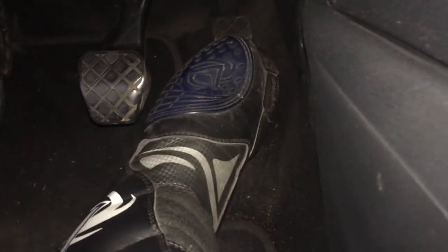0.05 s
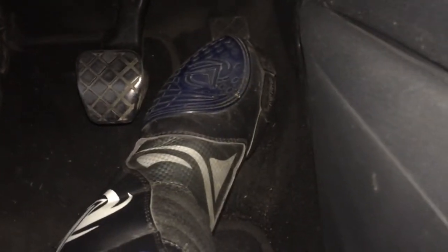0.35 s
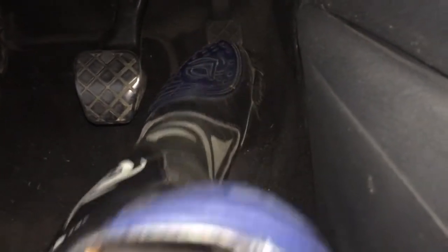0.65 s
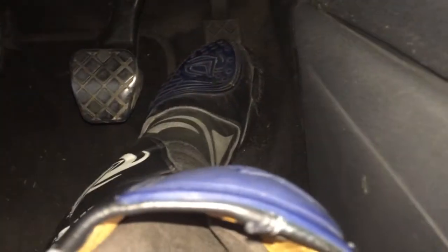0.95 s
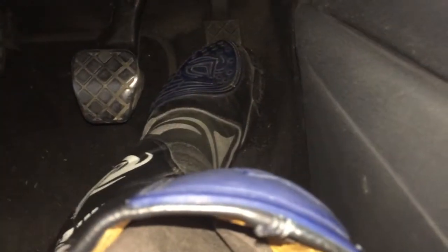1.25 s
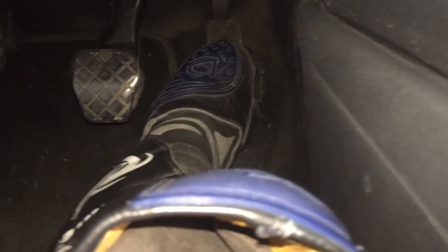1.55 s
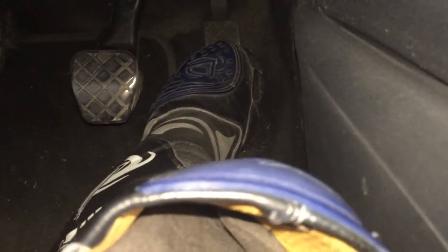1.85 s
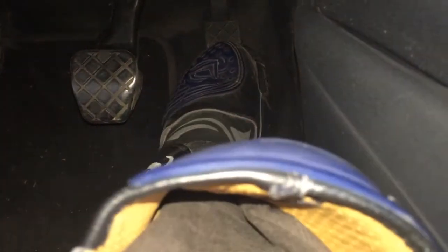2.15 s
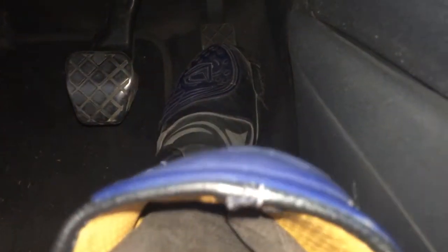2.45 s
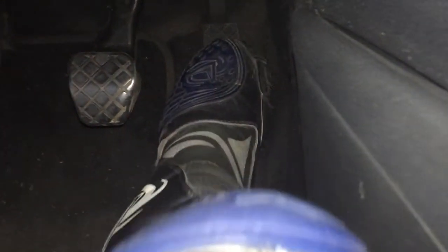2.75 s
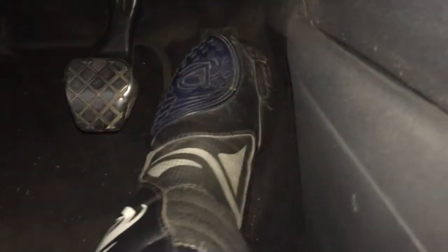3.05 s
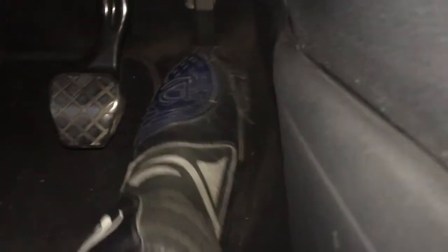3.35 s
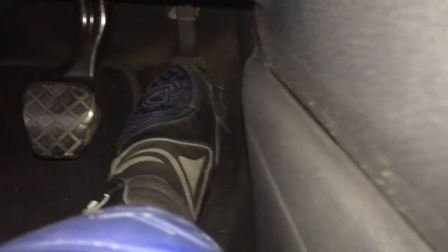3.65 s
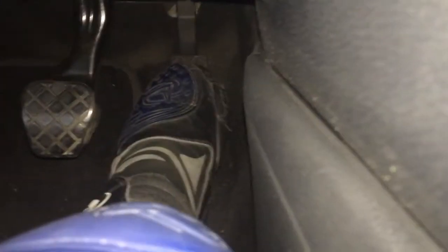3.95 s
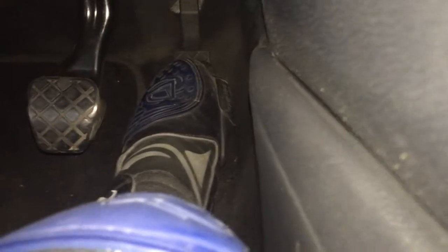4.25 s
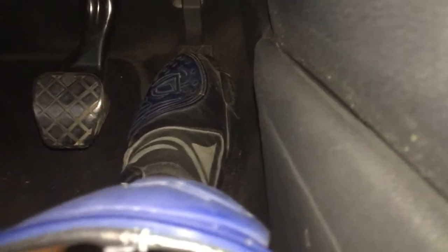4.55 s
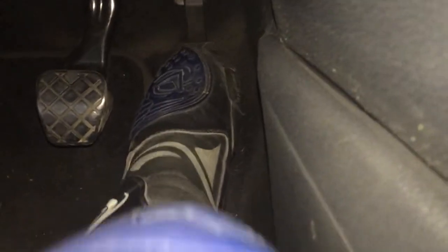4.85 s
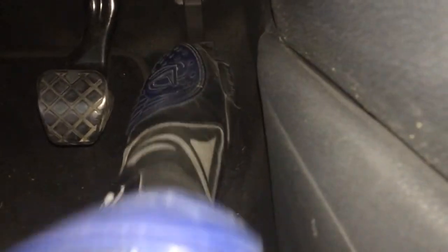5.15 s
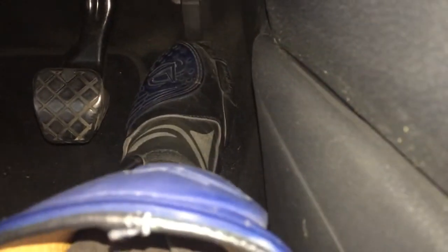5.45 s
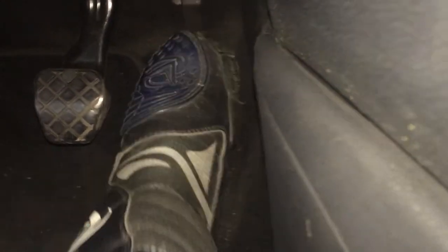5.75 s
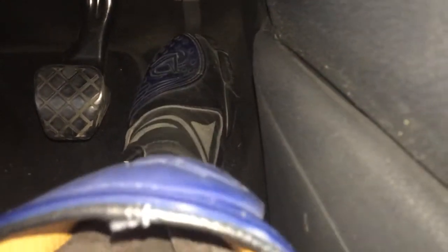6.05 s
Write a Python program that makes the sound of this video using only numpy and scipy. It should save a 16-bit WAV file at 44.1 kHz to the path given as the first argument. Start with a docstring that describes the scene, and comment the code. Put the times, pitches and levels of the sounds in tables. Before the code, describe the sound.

Close inside a humming car, a pedal knocks against its stop and creaks while a rubber sole thuds and scrapes.

```python
"""A car's accelerator pedal, pumped by a shoe, clacks on its end stop and sets the floor pan booming.
Held down, the loaded pedal creaks in runs of tiny slips, each one a sharp click.
The rubber sole thuds, scrapes and squeaks; trouser cloth swishes and snaps as the leg moves.
Under it all lies the low hum of the cabin, and everything is close by in the carpeted footwell."""
import sys
import numpy as np
from scipy import signal
from scipy.fft import rfft, irfft
from scipy.io import wavfile
from scipy.ndimage import map_coordinates

SR = 44100
rng = np.random.default_rng(int(sys.argv[2]) if len(sys.argv) > 2 else 0)


def wav_out(sig):
    """Save sig, one row per channel (or a flat mono array), as 16-bit PCM at SR to the path in sys.argv[1]."""
    wavfile.write(sys.argv[1], SR, np.round(np.clip(np.atleast_2d(sig).T, -1, 1) * 32767).astype(np.int16))


N = 273630
TIME = np.arange(N) / SR
RING = TIME[:SR * 3 // 4]  # time axis of one hit and its tail
TOP_HZ = 15600

# pedal presses: t/s at the stop, clack/dB, boom/dB, crack/dB, travel/s, cloth swish/dB,
# sole scrape/dB, swell over the travel/dB
PRESSES = [(0.7592, -19, -23, -25, 0.14, -49, -48.5, 11),
           (3.5477, -19.5, -23.5, -31.5, 0.11, -54, -50.5, 2.5),
           (5.2908, -19, -22, -22.5, 0.073, -53.5, -50, -2),
           (5.96, -15, -17.5, -18, 0.041, -45, -40.5, 2.5)]
# modes of the floor pan, and last the long ring of the cabin air: f/Hz, level/dB, t60/s
CABIN_MODES = [(44.4, -12, 0.108), (68.3, -10, 0.43), (123.8, 4, 0.12), (162.6, -6.5, 0.11),
               (215.4, -8, 0.14), (278.7, -13.5, 0.14), (364.5, -30.5, 0.31), (423, -12, 0.09),
               (140.2, -20.5, 0.8)]


def amp(db):
    """Decibels to gain."""
    return 10 ** (np.asarray(db) / 20)


def unit(x):
    """Scales to rms 1."""
    return x / np.sqrt(np.mean(x ** 2) + 1e-20)


def eq_gains(curve, size):
    """Spreads an EQ curve (f/Hz, level/dB) over the bins of a transform."""
    hz, db = np.transpose(curve)
    return amp(np.interp(np.log(np.fft.rfftfreq(size, 1 / SR) + 1), np.log(hz), db))


def tint(x, curve):
    """Colours x with an EQ curve (f/Hz, level/dB), at rms 1."""
    return unit(irfft(rfft(x) * eq_gains(curve, len(x)), len(x)))


def click(curve, size=2048):
    """The minimum-phase impulse with this EQ curve, peak 1."""
    cepstrum = irfft(np.log(eq_gains(curve, size)))
    cepstrum[1:size // 2] *= 2
    cepstrum[size // 2 + 1:] = 0
    pulse = irfft(np.exp(rfft(cepstrum)))
    return pulse / abs(pulse).max()


def wander(hz, size):
    """A random drift that turns about hz times a second."""
    knots = rng.standard_normal(size)
    return np.interp(np.arange(size) * hz / SR, np.arange(size), knots)


def fade(t60, rise=1e-5):
    """Envelope of a hit: an attack of about rise seconds, then an exponential tail."""
    return (1 - np.exp(-RING / rise)) * np.exp(-np.log(1000) * RING / t60)


def add(mix, s, sound):
    """Lays a sound into the mix at s seconds."""
    part = mix[max(round(s * SR), 0):][:len(sound)]
    part += sound[:len(part)]


def ring(modes, rise, spread):
    """Struck modes of alternating sign, slightly detuned by the changing load of the foot."""
    detune = 1 + spread * rng.standard_normal(len(modes))
    return sum((-1) ** k * amp(db) * fade(t60, rise) * np.sin(2 * np.pi * hz * detune[k] * RING)
               for k, (hz, db, t60) in enumerate(modes))


def cabin_hum():
    """The bed: a low cabin rumble that wavers slightly under a faint hiss."""
    # colour of the cabin air: f/Hz, level/dB
    hum_eq = [(20, -24.5), (32, -11.5), (45, -16), (56, 9.5), (72, -1), (90, 2), (115, -1), (145, -15),
              (190, -19), (300, -21), (600, -28), (1200, -36.5), (3000, -44.5), (15000, -47)]
    noise = tint(rng.standard_normal(N), hum_eq)
    bass = signal.sosfiltfilt(signal.butter(2, 160, fs=SR, output="sos"), noise)
    waver = amp(2.2 * wander(12, N))
    return amp(-51.5) * (noise + bass * (waver - 1))


def leg_motion():
    """Envelopes of swish, scrape and crackle: presses run to the stop and settle, shifts form an arch."""
    # the foot lifts or shifts: t/s, length/s, cloth swish/dB, sole scrape/dB, crackle/dB
    shifts = [(.01, 0.15, -76.5, -87, -87), (1.778, 0.23, -67.5, -66, -72),
              (1.959, 0.16, -56.5, -49.5, -65), (2.137, 0.17, -64.5, -57.5, -62.5),
              (2.328, .11, -64.5, -57.5, -64), (2.541, 0.094, -66.5, -64, -73),
              (2.64, 0.51, -60, -58.5, -65), (3.084, 0.34, -69.5, -69, -70), (3.78, .32, -100, -74, -80),
              (4.106, 0.27, -81, -70, -76), (4.487, 0.14, -77, -66.5, -74), (4.81, 0.39, -60, -56.5, -68),
              (5.5, 0.095, -82, -60.5, -70), (5.621, .26, -56.5, -50.5, -75)]
    cloth, sole = np.zeros((2, N))
    for stop, *_, travel, cloth_db, sole_db, swell_db in PRESSES:
        before, after = np.maximum(stop - TIME, 0), np.maximum(TIME - stop, 0)
        attack = np.exp(-np.maximum(before - travel, 0) / 0.02)  # the leg gets going
        press = (TIME < stop) * attack * amp(-swell_db * np.minimum(before / travel, 1))
        landed = TIME >= stop  # the cloth comes to rest, and the sole sooner
        cloth += amp(cloth_db) * press + landed * amp(-60.5) * np.exp(-after / 0.18)
        sole += amp(sole_db) * press + landed * amp(-45.5) * np.exp(-after / 0.06)
    crackle = amp(-8) * cloth
    for start, length, cloth_db, sole_db, crackle_db in shifts:
        off_centre = abs(2 * (TIME - start) / length - 1)
        near = off_centre < 2
        arch = amp(-16.5 * off_centre[near] ** 3.44)  # flat top: speeds up, holds, eases off
        cloth[near] += amp(cloth_db) * arch
        sole[near] += amp(sole_db) * arch
        crackle[near] += amp(crackle_db) * arch
    return cloth, sole, crackle


def rubbing(catches_per_s=130):
    """Cloth fibres catch in countless small grains and a few larger ones; the sole scrapes lower down."""
    # colours of the cloth's swish, its larger catches and the sole's scrape: f/Hz, level/dB
    swish_eq = [(300, -19.5), (1200, -15), (2000, -3), (3200, -1), (4500, -3.5), (6300, -4.5),
                (10500, -6.5), (15500, -11)]
    crackle_eq = [(300, -16), (1200, 2.5), (3200, -6), (6300, -4.5), (15500, -12)]
    scrape_eq = [(120, 3), (300, -5.5), (520, 0), (780, 0), (1100, -8.5), (1500, -12.5), (2000, -17),
                 (3000, -16), (8000, -43)]
    cloth, sole, crackle = leg_motion()
    fibres = rng.standard_normal(N) * amp(2.4 * wander(1200, N) + 1.3 * wander(90, N))
    impulses = (rng.random(N) < catches_per_s / SR) * rng.standard_normal(N)
    grain = rng.standard_normal(len(RING)) * fade(t60=0.008)
    catches = signal.oaconvolve(impulses, grain)[:N]
    tread = rng.standard_normal(N) * amp(1.6 * wander(150, N))
    return (cloth * tint(fibres, swish_eq) + crackle * tint(catches, crackle_eq)
            + sole * tint(tread, scrape_eq))


def cloth_snaps():
    """Folds of cloth and laces flick over: a sharp tick and a brief fizz, thin below its resonance."""
    # flicks of cloth and laces: t/s, level/dB, centre f/Hz
    flicks = [(.096, -51, 5000), (.721, -35, 6470), (1.955, -36, 810), (1.974, -35.5, 6200),
              (2.051, -38, 4960), (2.215, -37, 3180), (2.222, -34.5, 820), (2.236, -41, 2780),
              (2.2815, -38.5, 3350), (2.304, -36.5, 4200), (2.375, -40, 3000), (2.994, -34.5, 3240),
              (3.806, -51, 4930), (4.19, -57.5, 3560), (4.844, -45, 3760), (5.256, -31.5, 3320),
              (5.781, -38.5, 3780)]
    out = np.zeros(N)
    for s, db, hz in flicks:
        fizz_eq = [(hz / 4, -20), (hz / 2, -12), (hz, 0), (hz * 2, -6), (16000, -11)]
        fizz = tint(rng.standard_normal(len(RING)), fizz_eq) * fade(t60=0.027)
        tick = fade(t60=0.0036) * np.sin(2 * np.pi * hz * RING)
        add(out, s, amp(db) * (1.43 * tick + 0.4 * fizz))
    return out


def sole_squeaks():
    """Rubber sticks and slips fast enough to make a short, gritty, gliding tone."""
    # chirps of the sole: t/s, level/dB, length/s, starting f/Hz, glide/octaves, roughness/0-1
    chirps = [(0.7342, -38.5, 0.0053, 730, 0.033, 0.41), (1.954, -45.5, 0.002, 3150, 0.0068, 0.1),
              (3.463, -48.5, 0.0087, 892, .05, 0.54), (5.2203, -32.5, 0.015, 1326, 0.52, 0.49),
              (5.919, -33, 0.0091, 1077, 0.22, 0.71)]
    # colour of the sole's grit: f/Hz, level/dB
    grit_eq = [(300, -25), (1100, 3), (2400, -14), (3600, 3.5), (5000, -4), (7000, -5), (15000, -15.5)]
    out = np.zeros(N)
    for s, db, length, hz, glide, rough in chirps:
        along = np.linspace(0, 1, max(int(length * SR), 32))
        pitch = hz * 2 ** (glide * along) * (1 + 0.031 * rough * wander(1120, len(along)))
        turns = np.cumsum(pitch) / SR
        tone = sum(np.sin(2 * np.pi * k * turns) / k for k in range(1, 9) if k * hz < TOP_HZ)
        grit = tint(rng.standard_normal(len(along)), grit_eq)
        blend = (1 - rough) * unit(tone) + rough * grit
        arch = np.sqrt(abs(np.sin(np.pi * along)))
        add(out, s, amp(db) * unit(blend * arch))
    return out


def trim_crack():
    """Dense high modes of plastic trim: the treble dies sooner than the mids."""
    mid_eq = [(200, 8.5), (700, 3.5), (1100, 7.5), (1600, -2), (2300, -8), (4000, -20.5),
              (8000, -24), (15000, -42)]
    treble_eq = [(800, -31), (2200, 7), (4000, 0.5), (6000, -2), (9000, -10), (15000, -13)]
    mids = tint(rng.standard_normal(len(RING)), mid_eq) * fade(t60=0.039, rise=0.00058)
    treble = tint(rng.standard_normal(len(RING)), treble_eq) * fade(t60=0.035, rise=0.00013)
    return 1.2 * mids + 0.41 * treble


def sole_thuds():
    """The sole lands with a dull, sagging note; the carpet puffs, the floor gives and stirs the cabin."""
    # soft blows of sole and heel: t/s, level/dB, nominal f/Hz, t60/s, floor push/dB, floor f/Hz
    blows = [(.095, -51, 525, 0.03, -50, 196), (1.978, -11.5, 444, 0.012, -20, 237),
             (2.03, -40, 413, 0.099, -33, 209), (2.0765, -24, 450, 0.064, -33.5, 85),
             (2.718, -35.5, 700, 0.013, -67, 201), (3.068, -44, 295, 0.013, -43.5, 124),
             (3.278, -35, 480, 0.032, -36.5, 106.6), (5.108, -33, 525, 0.01, -31, 129),
             (5.124, -30, 564, 0.013, -28.5, 65), (5.1567, -19, 492, 0.036, -25, 76),
             (5.1595, -28.5, 480, 0.014, -25.5, 236), (5.803, -30.5, 453, 0.026, -25.5, 141.6),
             (5.8468, -24, 490, 0.03, -23.5, 75.7)]
    carpet_eq = [(100, -47), (220, 3.5), (320, -5.5), (600, -23), (1500, -59), (5000, -47)]
    out = np.zeros(N)
    for s, db, hz, t60, push_db, floor_hz in blows:
        pitch = hz * (0.683 + 0.5 * np.exp(-RING / 0.0089))
        sole = fade(t60, rise=0.001) * np.sin(2 * np.pi * np.cumsum(pitch) / SR)
        puff = amp(-13) * tint(rng.standard_normal(len(RING)), carpet_eq) * fade(t60=0.075, rise=0.004)
        floor = fade(t60=14 / floor_hz, rise=0.0031) * np.sin(2 * np.pi * floor_hz * RING)
        cabin = amp(-0.5) * min(1, 130 / floor_hz) ** 2 * ring(CABIN_MODES, rise=0.014, spread=0.057)
        trim = amp(-19.5 + 0.75 * db) * trim_crack()  # a harder blow cracks the trim louder
        add(out, s, amp(db) * (sole + puff) + amp(push_db) * (floor + cabin) + trim)
    return out


def pedal_slips(sag_db=-2, spread_db=1.4):
    """Stick-slip in lone ticks and in weakening runs that slow, hold or quicken: rows of t/s, level/dB."""
    # lone slips while the pedal is held or eased: t/s, level/dB
    lone_slips = [(1.116, -46), (1.1383, -47), (1.2515, -44.5), (1.5315, -45), (2.343, -41.5), (2.451, -44),
                  (3.8905, -38.5), (3.9365, -38), (4.2954, -46), (4.4865, -43.5), (4.7648, -44.5),
                  (5.383, -41.5), (6.028, -39), (6.049, -40)]
    # runs of slips under load: start t/s, end t/s, slip count, last gap over first gap, level/dB
    runs = [(.788, 0.892, 11, 1.5, -37), (0.958, 0.9897, 4, 1.45, -41.5), (1.0418, 1.0854, 6, 1.14, -42.5),
            (3.585, 3.657, 15, 1.6, -38), (3.667, 3.71, 5, 0.87, -41.5), (3.787, 3.817, 3, 1.2, -36.5),
            (5.32, 5.366, 8, 2.1, -37.5), (5.402, 5.5144, 5, 1.03, -38.5), (5.529, 5.591, 5, 1.16, -35),
            (5.602, 5.626, 4, 1, -40.5), (6.1347, 6.1934, 6, 0.74, -36.5)]
    rows = list(lone_slips)
    for start, end, count, slowing, db in runs:
        gaps = np.geomspace(1, slowing, count - 1)
        along = np.append(0, np.cumsum(gaps)) / gaps.sum()
        levels = db + sag_db * along + spread_db * rng.standard_normal(len(along))
        rows += zip(start + (end - start) * along, levels)
    return rows


def pedal_creaks(hollow_q=4.4, hollow_depth=0.82):
    """Each slip is one sharp click, a little unlike the last, scattered faintly off the footwell walls."""
    # colours of a slip's body and of its sharp edge: f/Hz, level/dB
    body_eq = [(150, -48), (450, -2), (800, 3), (1150, 3.5), (1500, -0.5), (2350, 0.5), (2850, -1),
               (3250, -13.5), (3900, -9.5), (5200, -15.5), (9000, -22), (15000, -24.5)]
    edge_eq = [(700, 4), (2500, -48.5), (3700, -7), (4500, 0.5), (5300, -22.5), (8000, -21), (15000, -15)]
    # timbre as the foot changes place: t/s, edge against body/dB, hollow f/Hz
    timbre = [(1, -3.5, 1930), (1.5, -1.5, 1950), (3.7, -9.5, 1200), (4.4, 2, 1170), (5.4, -33, 1300),
              (6.2, -7, 1220)]
    when, edge_db, hollow_hz = np.transpose(timbre)
    body, edge = click(body_eq), np.roll(click(edge_eq), 6)
    out = np.zeros(N)
    for s, db in pedal_slips():
        detune, bite = rng.standard_normal(2)
        slip = body + amp(np.interp(s, when, edge_db) + 1.4 * bite) * edge
        notch = signal.iirnotch(np.interp(s, when, hollow_hz), hollow_q, fs=SR)
        slip += hollow_depth * (signal.lfilter(*notch, slip) - slip)
        repitched = map_coordinates(slip, [np.arange(len(slip)) * (1 + 0.035 * detune)])
        add(out, s, amp(db) * repitched)
    scatter = amp(-19) * rng.standard_normal(1024) * fade(t60=0.021, rise=0.00073)[:1024]
    scatter[0] = 1  # the direct sound
    return signal.oaconvolve(out, scatter)[:N]


def pedal_knocks():
    """The pedal clacks on its stop, the trim cracks, and the floor pan booms just after."""
    # modes of the pedal and its stop: f/Hz, level/dB, t60/s
    pedal_modes = [(482, -5.5, 0.045), (582, -11.5, 0.056), (688, -7, 0.043), (807, -1.5, 0.028),
                   (971, 0, 0.036), (1196, -12, 0.043), (1359, -13, 0.046), (1663, 0.5, 0.015),
                   (1690, -6.5, 0.012), (2133, -21.5, 0.031), (2630, -23, 0.028), (2880, -30, 0.02),
                   (3000, -41.5, 0.042), (3430, -15.5, 0.016), (3800, -18.5, 0.011), (4140, -15.5, 0.017),
                   (4510, -29, .03), (5150, -34, 0.054)]
    out = np.zeros(N)
    for s, clack_db, boom_db, crack_db, *_ in PRESSES:
        add(out, s, amp(clack_db) * ring(pedal_modes, rise=0.0005, spread=0.0069))
        add(out, s, amp(crack_db) * trim_crack())
        add(out, s + 0.0012, amp(boom_db) * ring(CABIN_MODES, rise=0.0045, spread=0.023))
    return out


def scene():
    """Cabin, cloth, shoe and pedal in one close mono mix."""
    bed = cabin_hum() + rubbing()
    return (bed + pedal_knocks() + sole_thuds() + pedal_creaks() + sole_squeaks() + cloth_snaps())[None]


def record(dry):
    """A steep low-pass takes off the very top."""
    lowpass = signal.firwin(511, TOP_HZ, window=("kaiser", 9), fs=SR)
    return signal.oaconvolve(dry, lowpass[None], "same")


dry = scene()
out = record(dry)
wav_out(out)
```